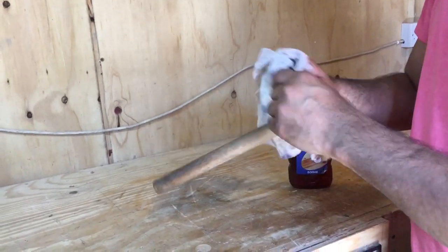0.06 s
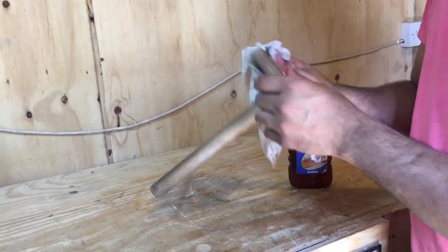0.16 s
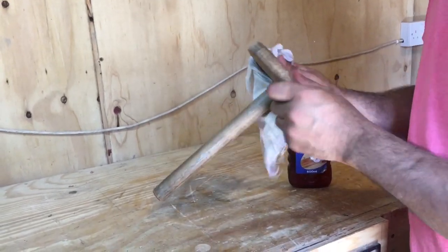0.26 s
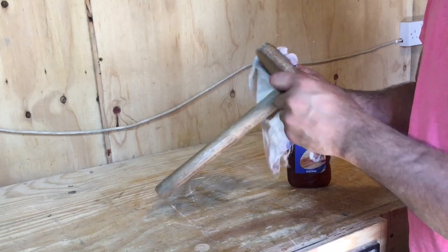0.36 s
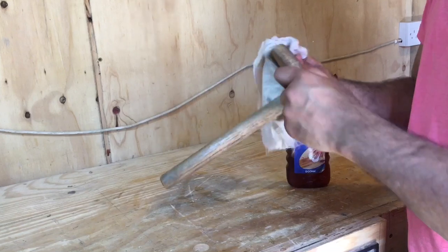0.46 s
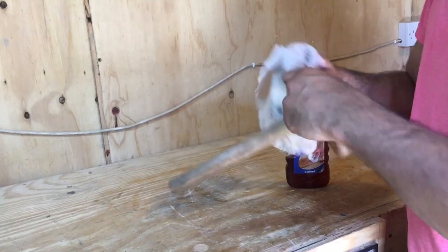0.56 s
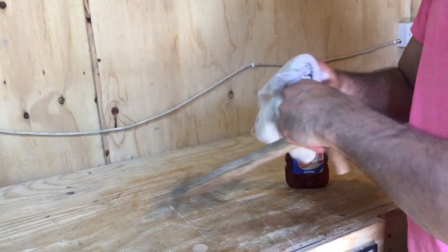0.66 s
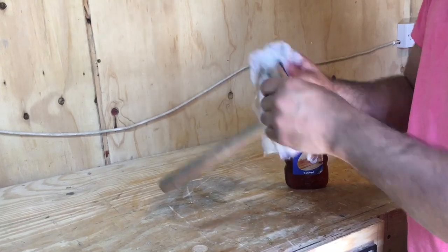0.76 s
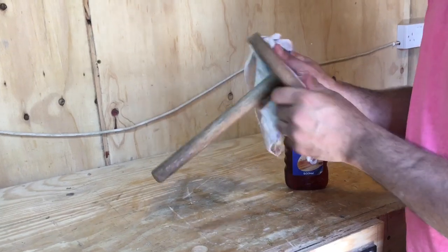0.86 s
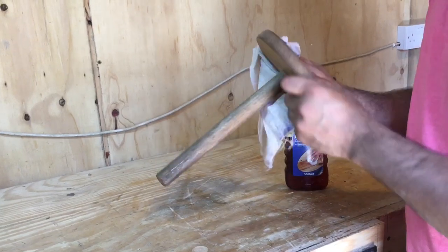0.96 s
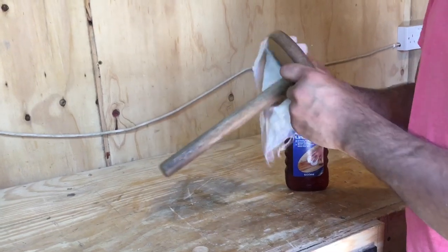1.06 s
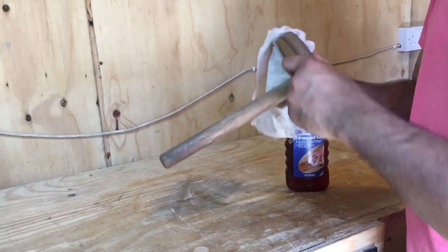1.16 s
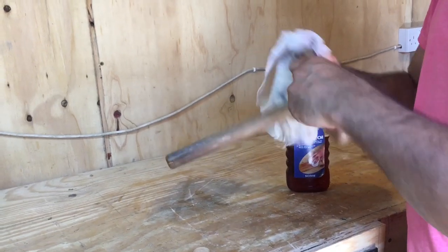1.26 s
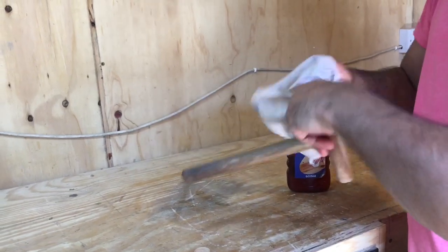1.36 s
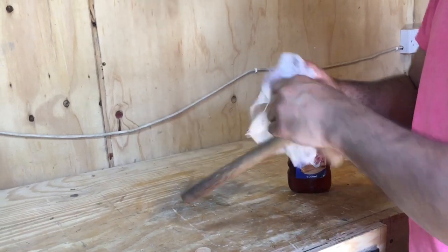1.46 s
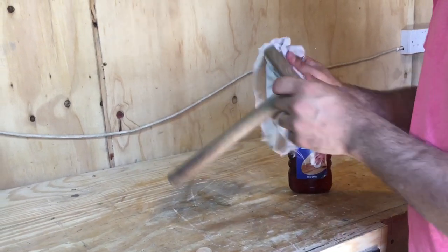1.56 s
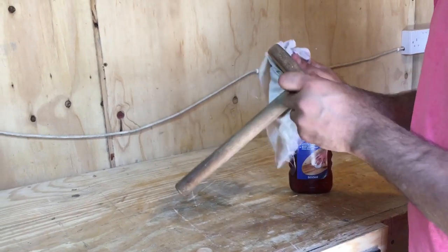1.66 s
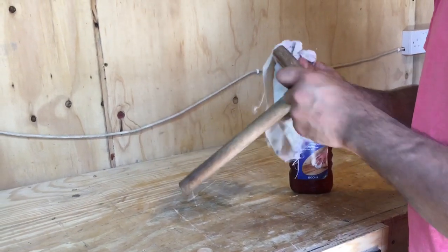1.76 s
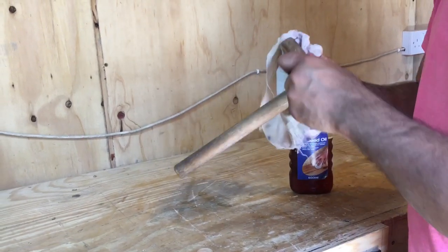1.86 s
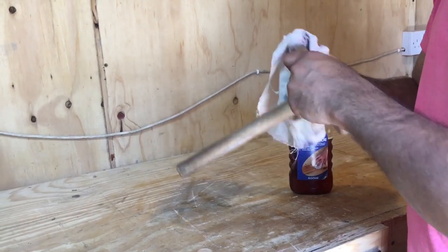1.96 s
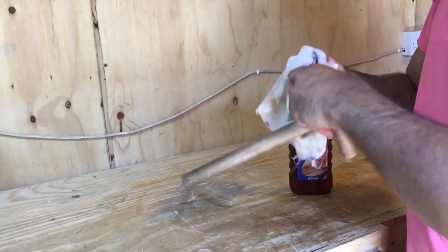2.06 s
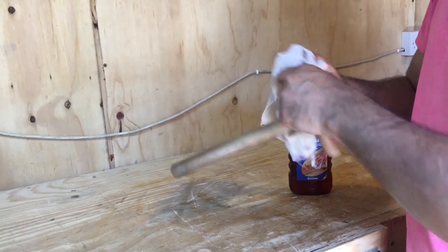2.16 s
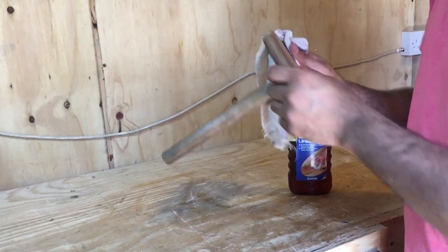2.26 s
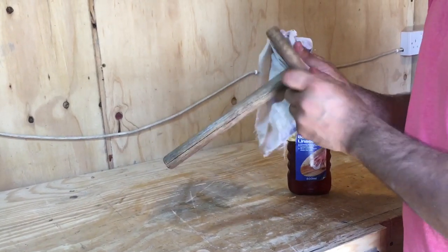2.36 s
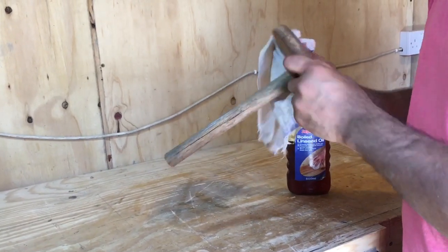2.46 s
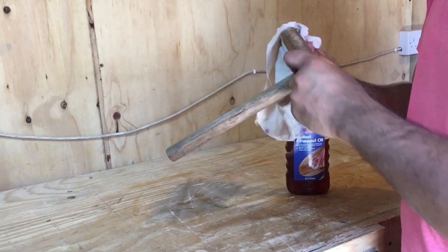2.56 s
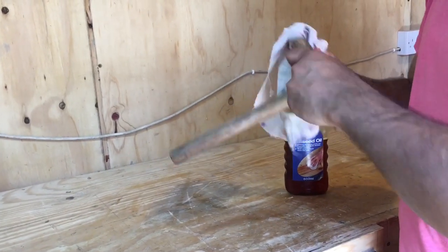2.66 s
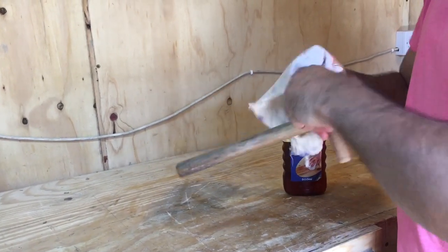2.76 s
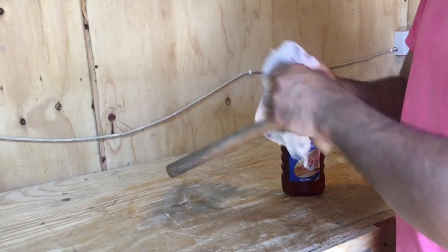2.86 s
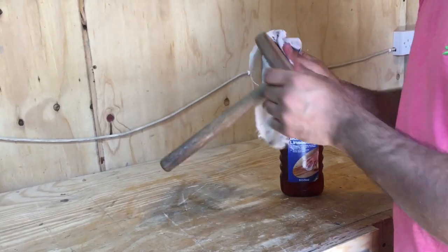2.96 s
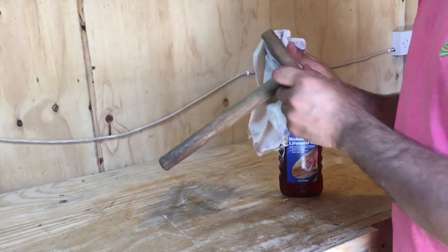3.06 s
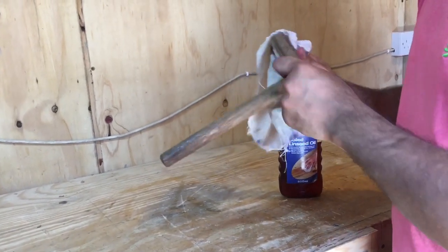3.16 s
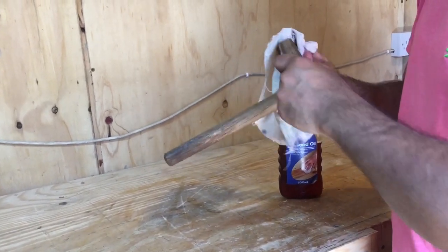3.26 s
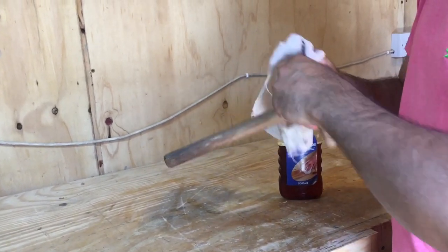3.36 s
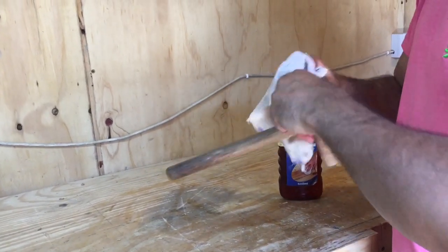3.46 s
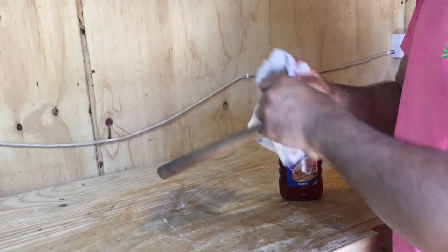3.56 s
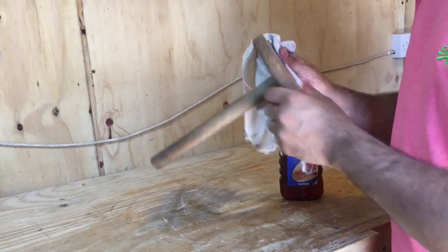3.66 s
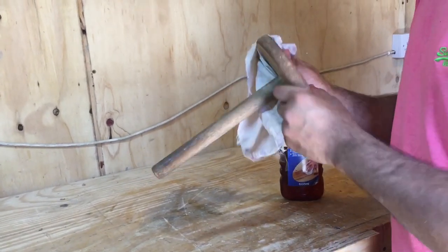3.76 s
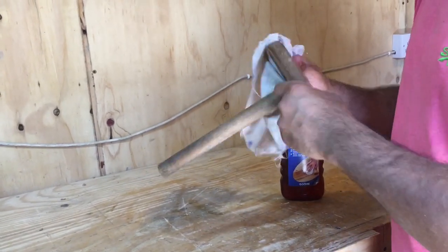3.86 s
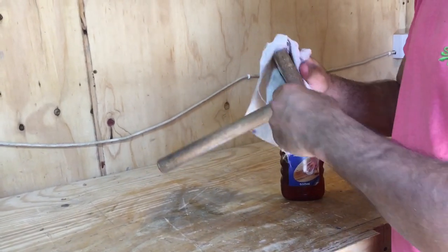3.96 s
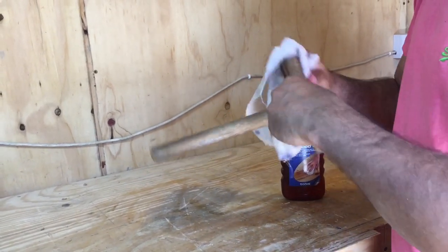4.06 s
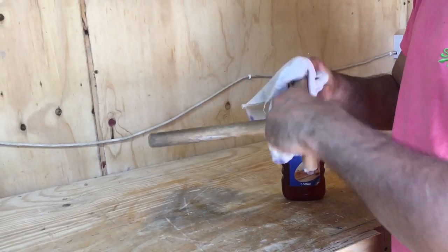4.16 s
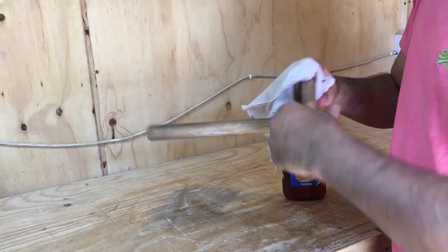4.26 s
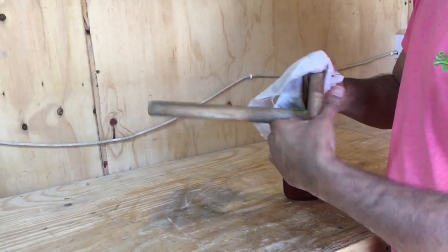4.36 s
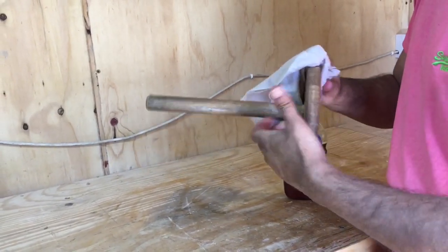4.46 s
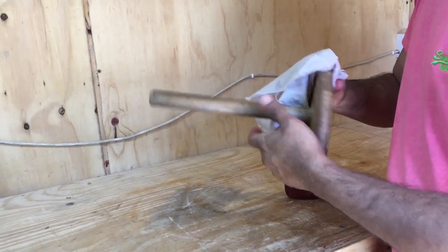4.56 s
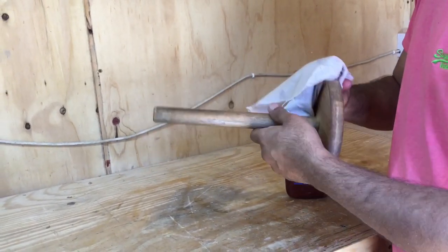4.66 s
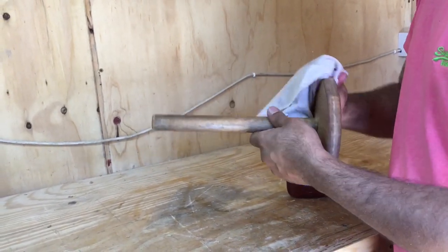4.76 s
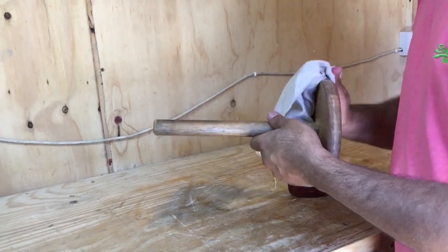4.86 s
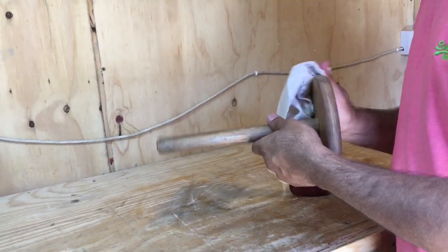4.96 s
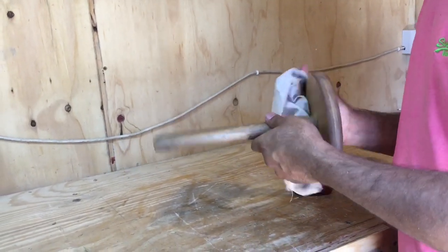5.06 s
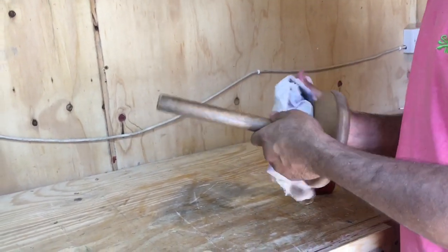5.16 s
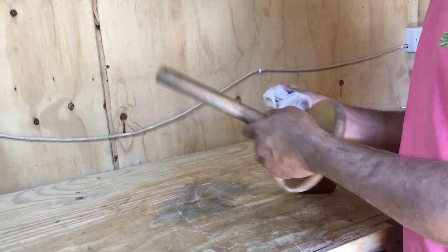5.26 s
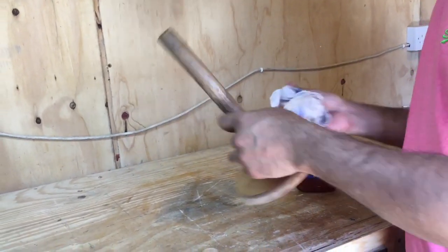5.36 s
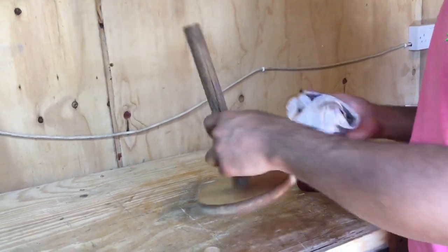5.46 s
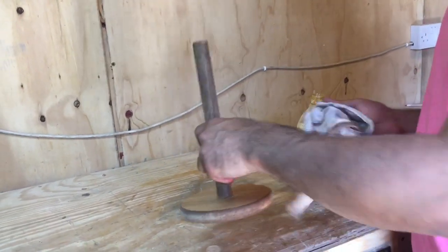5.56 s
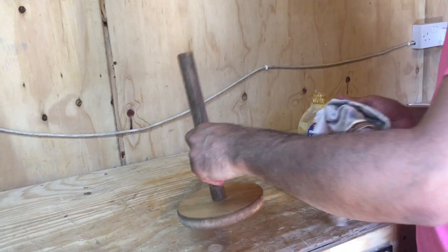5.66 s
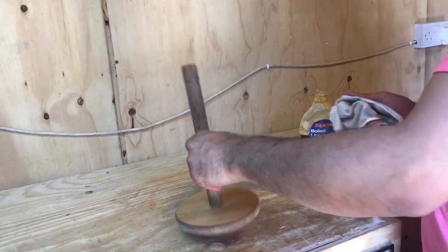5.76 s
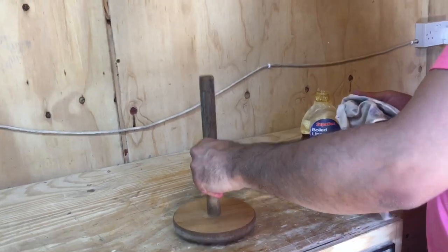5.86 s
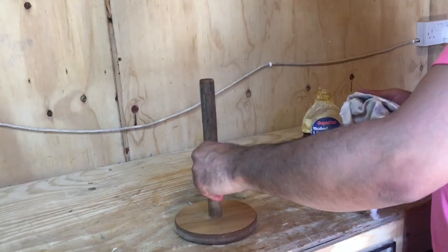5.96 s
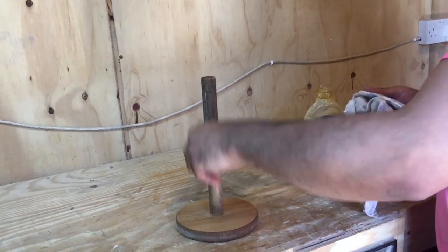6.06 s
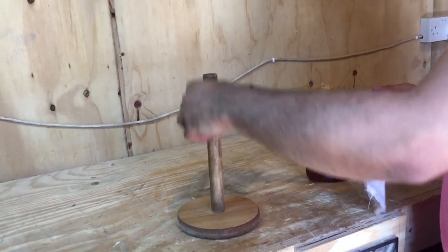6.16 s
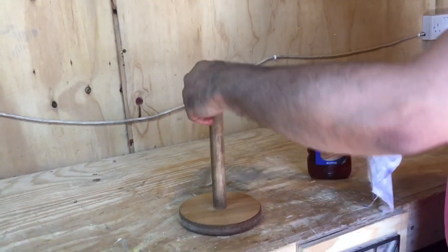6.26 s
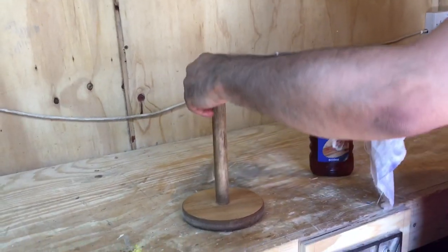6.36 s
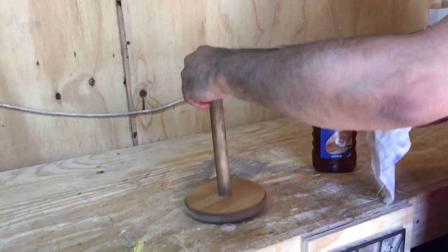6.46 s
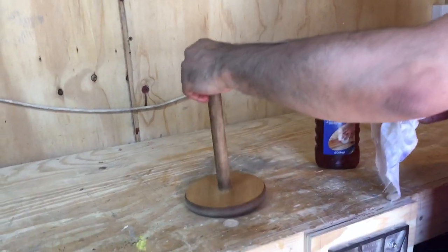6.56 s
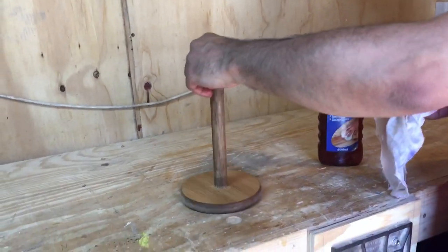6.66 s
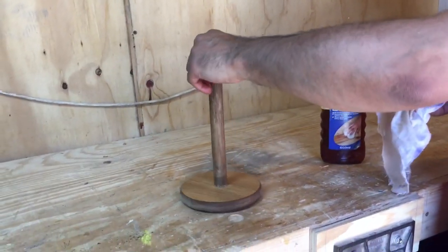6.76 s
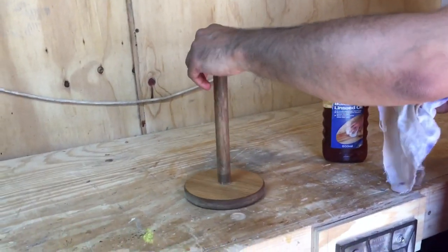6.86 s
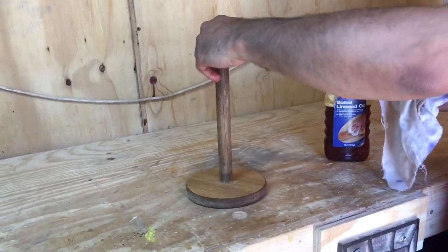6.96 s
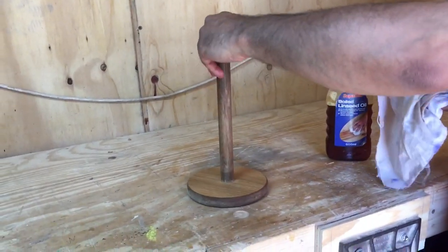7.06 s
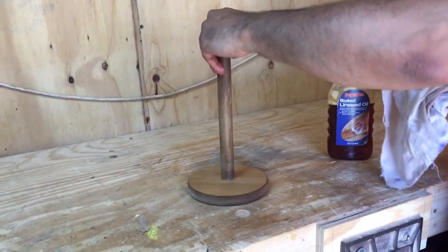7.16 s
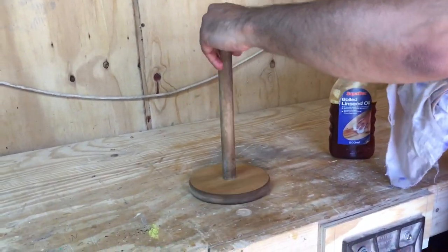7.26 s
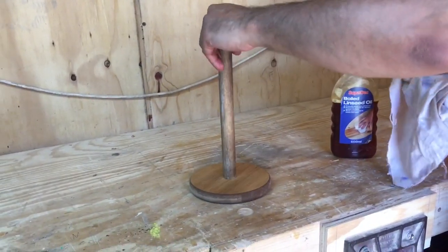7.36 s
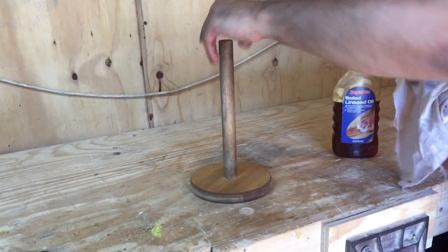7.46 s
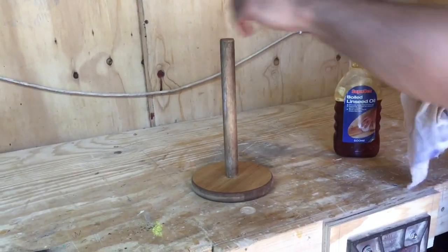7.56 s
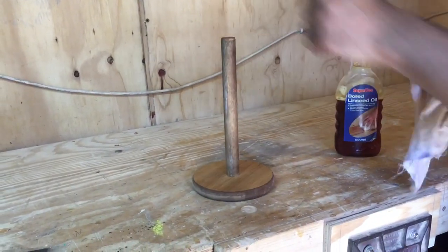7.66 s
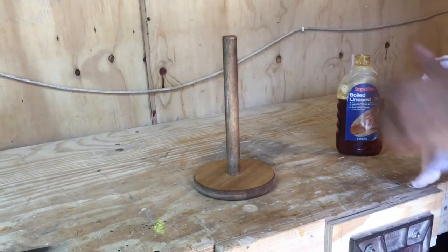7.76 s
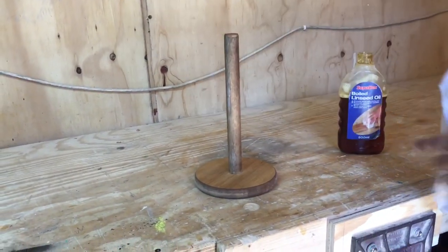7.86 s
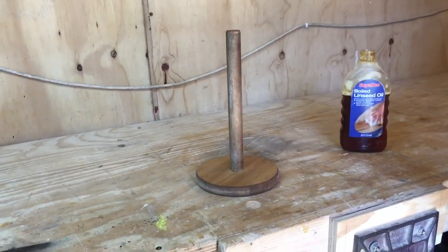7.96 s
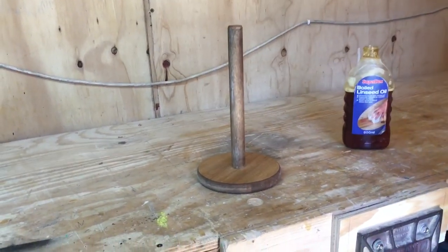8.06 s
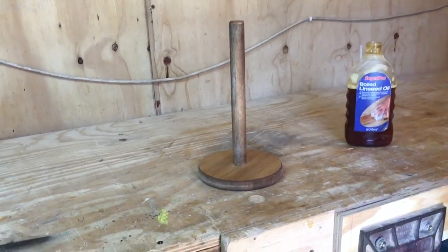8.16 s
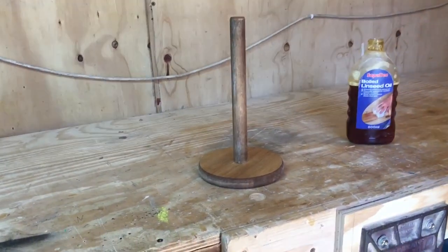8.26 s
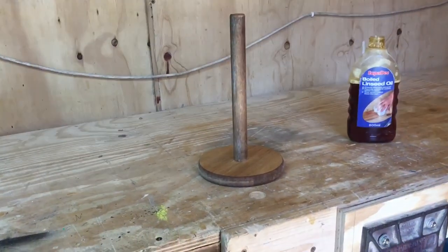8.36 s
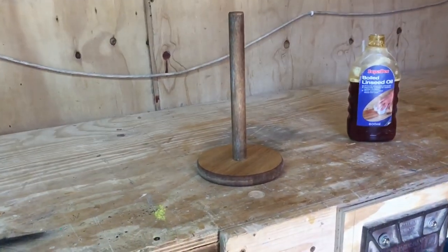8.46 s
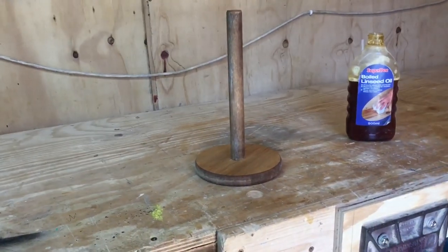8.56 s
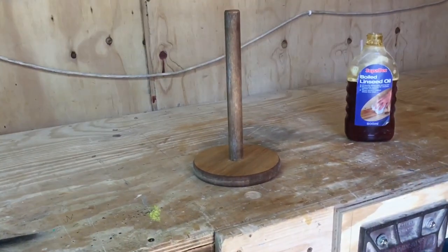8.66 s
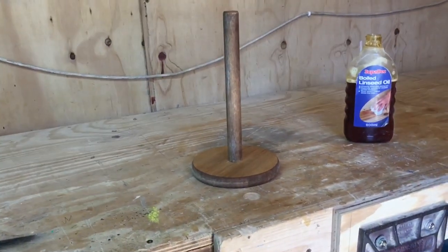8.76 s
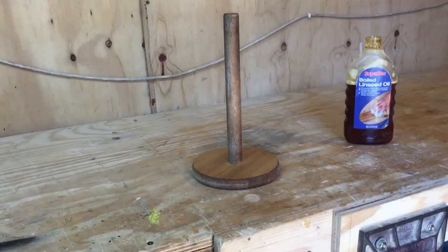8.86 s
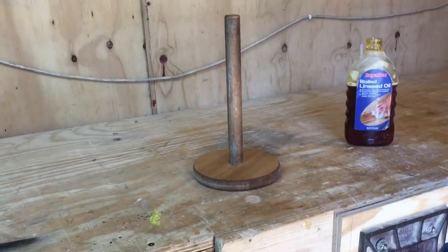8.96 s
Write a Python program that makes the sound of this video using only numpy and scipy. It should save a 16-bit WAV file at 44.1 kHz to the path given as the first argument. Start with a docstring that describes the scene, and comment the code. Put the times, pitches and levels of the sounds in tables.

```python
"""Quick strokes of a cloth on a wooden stand, close by in a plywood shed, over the drone of far traffic
in the shed's low modes. The fibres hiss, and firm strokes make the wood sing. At six seconds the stand
is set on the bench and the shed booms; the stand rocks on its rim, slides with a judder and knocks again.
Then hands brush clothing and small things tap nearby. The walls answer the hits briefly."""
import sys
import numpy as np
from scipy import signal
from scipy.fft import rfft, irfft, next_fast_len
from scipy.io import wavfile
from scipy.ndimage import uniform_filter1d, map_coordinates

SR = 44100
rng = np.random.default_rng(int(sys.argv[2]) if len(sys.argv) > 2 else 0)


def pcm_store(signal):
    """Save signal as 16-bit PCM."""
    levels = np.round(np.clip(np.atleast_2d(signal), -1, 1) * 32767)
    wavfile.write(sys.argv[1], SR, levels.astype(np.int16).T)


N = 396882
LEVEL_TIMES = np.arange(0, N / SR + .001, .001)  # seconds, one point each millisecond

# Resonances of the wooden stand. Each row: frequency in Hz, width in Hz, gain in dB.
STAND_MODES = [(1155, 14, -3), (1484, 8.3, 4.5), (1747, 14, 0.5), (1770, 14, -24), (2248, 16, -7),
               (3074, 17, 2.5), (3850, 20, -15), (4260, 32, -23)]
# Low resonances, the shed's air first, then the bench. Each row: frequency in Hz, width in Hz, gain in dB.
BOOM_MODES = [(67.8, 4, 5), (103.7, 9.8, -1), (128.3, 13.6, -7.5), (147.5, 28, -13)]


def amp(db):
    """Gain of a level in dB."""
    return 10 ** (np.asarray(db) / 20)


def unit(x):
    """x at rms 1."""
    return x / np.sqrt(np.mean(x ** 2) + 1e-20)


def along(points, hz):
    """Read (Hz, value) points at hz, on a log frequency axis."""
    freqs, values = np.transpose(points)
    return np.interp(np.log(hz + 1), np.log(freqs + 1), values)


def curves(rows):
    """One value per sample for each column after the time."""
    times, *columns = np.transpose(rows)
    return [np.interp(np.arange(N) / SR, times, column) for column in columns]


def per_sample(level):
    """A level of each millisecond, read at every sample."""
    return np.interp(np.arange(N) / SR, LEVEL_TIMES, level)


def wobble(rate):
    """A smooth random curve, rate knots a second."""
    return map_coordinates(rng.standard_normal(int(N * rate / SR) + 4), [np.arange(N) * rate / SR])


def filtered(x, response):
    """x through a complex response of frequency."""
    size = next_fast_len(N + SR // 2)
    return irfft(rfft(x, size) * response(np.fft.rfftfreq(size, 1 / SR)), size)[..., :N]


def shaped(x, spectrum):
    """x coloured by (Hz, dB) points, rms 1."""
    return unit(filtered(x, lambda hz: amp(along(spectrum, hz))))


def modes(peaks):
    """Causal response of (Hz, width in Hz, dB) resonances of alternating sign."""
    return lambda f: sum((-1) ** k * amp(db) * 1j * f * width / (hz * hz - f * f + 1j * f * width)
                         for k, (hz, width, db) in enumerate(peaks))


def ring(partials, t, scatter_db):
    """One blow on (Hz, dB, t60 in seconds) modes, each at a new strength; peak 1."""
    x = sum(amp(db + scatter_db * rng.normal() - 60 * t / t60) * np.sin(2 * np.pi * hz * t)
            for hz, db, t60 in partials)
    return x / np.abs(x).max()


def grit(patchy_db, grain_db):
    """White friction noise: patches in pitch and time, and grains of uneven size."""
    grains = signal.stft(rng.standard_normal(N) * amp(grain_db * wobble(400)), nperseg=512)[2]
    patches = uniform_filter1d(uniform_filter1d(rng.standard_normal(grains.shape), 6, 0), 8, 1)
    return unit(signal.istft(grains * amp(patchy_db * unit(patches)), nperseg=512)[1][:N])


def stroke_db(start, length, change_db, rise_db_s, fall_db_s):
    """Level of a rub each millisecond: it sets in, drifts by change_db, then lets go."""
    times = [start - 80 / rise_db_s, start, start + length, start + length + 80 / fall_db_s]
    return np.interp(LEVEL_TIMES, times, [-80, 0, change_db, change_db - 80])


def traffic():
    """Far off: a broad rumble and an engine slowing as it leaves."""
    rumble_levels = [(0.0, -53.5), (2.1, -51.5), (2.43, -54), (4.04, -53.5), (5.67, -57), (5.95, -54.5),
                     (7.6, -51), (8.086, -58.5), (8.554, -55.5), (9.0, -53.5)]  # Each row: time in seconds, level in dB.
    rumble_spectrum = [(15, -48), (25, -28), (46, 5.5), (65, 7), (92, -0.5), (118, 1), (156, -1.5),
                       (193, -2.5), (343, -14), (500, -28), (650, -25.5), (1100, -120)]  # Each row: frequency in Hz, relative density in dB.
    engine = [(0, 75.8, -46.5), (.7, 77.04, -45.5), (1.1, 73.1, -50), (1.8, 67.4, -55.5), (2.7, 64.8, -70),
              (4.1, 55.3, -48), (4.8, 46.9, -56), (5.6, 41.8, -66.5), (5.9, 39.8, -92)]  # Each row: time in seconds, note in Hz, level in dB.
    rumble_db, = curves(rumble_levels)
    rumble = amp(rumble_db) * shaped(rng.standard_normal(N) * amp(2.3 * wobble(9.7)), rumble_spectrum)
    engine_hz, engine_db = curves(engine)
    engine_phase = 2 * np.pi * np.cumsum(engine_hz) / SR
    return rumble + amp(engine_db + 2 * wobble(11)) * np.sin(engine_phase + 1.1 * wobble(3.4))


def shed_drone():
    """Two low notes of the shed, stirred by far traffic, then booming on after the stand is set down."""
    notes_hz = [65.1, 106.5]  # The two pitches in Hz.
    levels = [(0.0, -54, -65), (0.71, -44, -53), (2.15, -60.5, -54.5), (2.8, -45.5, -62), (3.13, -67, -62),
              (3.73, -59, -53.5), (4.44, -50, -63), (4.9, -69, -67), (6.0, -60, -63.5), (6.17, -37.5, -55),
              (6.3, -46, -58), (6.4, -40.5, -53), (6.55, -48, -55), (6.62, -70, -65)]  # Each row: time in seconds, level of each note in dB.
    out = np.zeros(N)
    for hz, db in zip(notes_hz, curves(levels)):
        level = amp(db + 4.9 * wobble(9.8))
        out += level * np.sin(2 * np.pi * hz * np.arange(N) / SR + 1.64 * wobble(7.3))
    return out


def room_air():
    """A faint, steady hiss of air all around the microphone."""
    spectrum = [(180, -23), (300, -1.5), (461, -6), (794, -7.5), (1050, -8), (5750, -22.5), (7740, -27.5),
                (8830, -24), (13100, -32), (15500, -44)]  # Each row: frequency in Hz, relative density in dB.
    return amp(-70) * shaped(grit(patchy_db=0, grain_db=0.5), spectrum)


def cloth():
    """Close by, fibres hiss over the grain; pressure also wakes the modes of the stand."""
    # Strokes of cloth and skin. Each row: start and length in seconds, first and last hiss level in dB,
    # pressure sound in dB over the hiss.
    strokes = [(0, 0.048, -58, -58, -1), (0.143, 0.17, -70.5, -71.5, -6.5),
               (0.42, 0.091, -66.5, -56.5, -4.5), (0.551, 0.15, -57.5, -55.5, -3),
               (0.792, 0.22, -68, -76, -2), (1.05, 0.12, -72, -57.5, -4.5), (1.213, .2, -59.5, -54.5, -4),
               (1.487, 0.18, -71.5, -69, -6), (1.755, 0.14, -74, -67, -1.5),
               (1.937, 0.21, -62.5, -57, -1.5), (2.259, 0.076, -70, -70.5, -5),
               (2.512, .065, -65.5, -59, -5), (2.606, .22, -65.5, -53.5, -3.5),
               (2.922, 0.062, -70.5, -66.5, -4), (3.0, .1, -72, -79.5, -16), (3.208, 0.12, -61, -59, -3.5),
               (3.359, 0.14, -63, -56, -2), (3.606, 0.18, -70, -71.5, 0.5),
               (3.874, 0.069, -67.5, -58.5, -6.5), (3.995, 0.057, -61.5, -60.5, -2),
               (4.118, 0.088, -59.5, -58.5, -5.5), (4.32, 0.056, -81, -76, 3),
               (4.372, 0.028, -68, -61.5, 5.5), (4.657, .33, -84, -75, 1.5), (5.04, 0.077, -76, -67, -5),
               (5.11, 0.25, -72.5, -73, -3), (5.42, 0.53, -79.5, -82.5, -15), (6.25, 0.24, -83, -76.5, 7),
               (7.597, 0.023, -71, -66, 1.5), (7.627, 0.043, -61, -60.5, 3), (7.723, 0.23, -73.5, -83, 4.5),
               (8.047, 0.2, -77.5, -76, 4.5), (8.244, .04, -71.5, -70, 8.5), (8.319, 0.024, -69, -66, 4),
               (8.438, 0.23, -80, -77.5, 0.5), (8.646, 0.029, -71, -64, 3.5),
               (8.668, 0.063, -63.5, -59, 2.5), (8.759, 0.23, -68.5, -76, 7)]
    # Fidgets of the cloth and grit under the base. Each row: start in seconds, dB, length in seconds.
    fidgets = [(.91, -74, .025), (1.82, -64.5, 0.025), (1.868, -68.5, 0.019), (2.42, -72, 0.033),
               (3.075, -77, .02), (4.486, -67, 0.045), (4.54, -69.5, 0.036), (4.667, -65, 0.023),
               (4.7, -74, 0.025), (4.733, -67, 0.018), (4.766, -66, 0.011), (4.81, -68, 0.011),
               (4.856, -69, 0.012), (4.8806, -63.5, 0.03), (4.927, -73, 0.04), (5.345, -75, 0.016),
               (5.558, -72.5, .025), (6.007, -73, 0.021), (6.045, -62.5, 0.011), (6.84, -68, .02),
               (6.92, -73, .012), (6.94, -70, .012), (6.954, -69.5, 0.024), (6.989, -69.5, 0.024)]
    # Colours of the fibre hiss and the pressure sound. Each row: frequency in Hz, relative density in dB.
    fibre_spectrum = [(1470, -13.5), (2500, -7), (4330, -1), (4930, -5), (5700, -0.5), (7110, -3),
                      (7790, -5), (9140, -5.5), (12200, -10.5), (15500, -22.5)]
    press_spectrum = [(470, 3), (800, 0), (960, 0), (1710, 6.5), (2240, 3.5), (2990, 3.5), (4000, -0.5),
                      (5200, -2.5), (8800, -120)]
    let_go_s = 7.5  # the hand leaves the stand; later rubbing no longer rings in it
    hiss, press, flicks = np.zeros((3, len(LEVEL_TIMES)))
    for start, length, first_db, last_db, press_db in strokes:
        level = amp(first_db + stroke_db(start, length, last_db - first_db, rise_db_s=1196, fall_db_s=358))
        hiss = np.hypot(hiss, level)
        press = np.hypot(press, amp(press_db) * level)
    for start, db, length in fidgets:
        age = np.clip(LEVEL_TIMES - start, 0, 1) / (.35 * length)
        flicks += amp(db) * age * np.exp(1 - age ** 1.1)
    hiss = per_sample(hiss) * amp(.9 * wobble(25)) + per_sample(flicks)
    rub = grit(patchy_db=1.8, grain_db=1.5)
    stand_gain = amp(-8 + 3.2 * wobble(6.7)) * per_sample(LEVEL_TIMES < let_go_s)
    body = shaped(rub, press_spectrum) + stand_gain * unit(filtered(rub, modes(STAND_MODES)))
    return hiss * shaped(rub[::-1], fibre_spectrum) + per_sample(press) * unit(body)


def squeaks():
    """A firm stroke makes one mode of the stand sing with a shaky phase."""
    notes = [(.57, -59.5, 1524, .12), (0.815, -61, 1465, 0.025), (2.751, -62, 1730, 0.13),
             (2.798, -57.5, 3700, 0.048), (2.921, -65, 1503, 0.064), (6.432, -74, 1700, 0.044),
             (6.656, -60.5, 3000, 0.097), (6.65, -51, 3660, 0.034), (6.673, -49.5, 1504, 0.047)]  # Each row: start in seconds, level in dB, pitch in Hz, length in seconds.
    out = np.zeros(N)
    for start, db, hz, length in notes:
        t = np.arange(round(length * SR)) / SR
        shake = np.cumsum(.09 * rng.standard_normal(8192))[:len(t)]
        fade = signal.windows.tukey(len(t), .5)
        out[round(start * SR):][:len(t)] += amp(db) * fade * np.sin(2 * np.pi * hz * t + shake)
    return out


def ticks():
    """Small hard contacts nearby: one short mode with neighbours, smeared by a gritty touch."""
    # Each row: start in seconds, peak in dB, pitch in Hz, t60 in seconds, roughness from 0 to 1.
    contacts = [(1.417, -42.5, 1173, 0.073, 0.48), (2.419, -44, 2614, 0.028, 0.4),
                (4.331, -42, 296, 0.062, 0.3), (4.331, -48.5, 1380, .025, 0.46),
                (4.35, -40.5, 253, .07, 0.18), (4.344, -47, 1660, 0.037, 0.15),
                (4.55, -55, 3020, 0.047, 0.3), (5.359, -57, 3110, 0.028, 0.7),
                (5.568, -52, 2987, 0.071, 0.05), (5.568, -62, 5070, .06, .2),
                (6.047, -47, 3770, 0.017, 0.7), (6.63, -40, 3720, 0.018, 0.33),
                (7.918, -49.5, 1165, 0.035, 0.6), (7.95, -40.5, 200, 0.22, 0.1),
                (8.107, -52, 2270, 0.025, 0.65), (8.332, -48, 1910, 0.019, 0.36),
                (8.378, -42, 890, 0.013, 0.3), (8.534, -52, 1260, 0.016, 0.5)]
    out, t = np.zeros(N + SR), np.arange(SR // 5) / SR
    for start, db, hz, t60, rough in contacts:
        tick = ring([(hz, 0, t60), (1.13 * hz, -5, t60), (.86 * hz, -6, t60)], t, scatter_db=1.5)
        tick *= 1 - rough + rough * unit(uniform_filter1d(rng.standard_normal(len(t)), size=40))
        tick *= 1 - np.exp(-t / 0.00014)
        out[round(start * SR):][:len(t)] += amp(db) * tick / np.abs(tick).max()
    return out[:N]


def shed_reverb(x):
    """The plywood walls answer 4.5 ms late, each frequency dying at its own speed."""
    decay_times = [(150, 0.24), (1000, 0.16), (8000, 0.23)]  # Each row: frequency in Hz, t60 in seconds.
    hz, t, noise = signal.stft(rng.standard_normal(SR // 2), SR, nperseg=256)
    tail = signal.istft(noise * amp(-60 * t / along(decay_times, hz)[:, None]), SR, nperseg=256)[1]
    return signal.fftconvolve(np.pad(x, (200, 0)), tail / np.linalg.norm(tail))[:N]


def knocks():
    """The stand's base strikes the bench's modes, then chatters; a longer contact is duller."""
    contacts = [(6.016, -9, 0.42), (6.021, -15, 0.41), (6.037, -13.5, 0.55), (6.054, -20.5, 0.57),
                (6.074, -34, 0.5), (6.63, -22.5, 0.23), (6.848, -22.5, 0.53), (6.955, -21, 0.76),
                (6.975, -32.5, 1), (6.993, -31, 0.59), (7.019, -39, 0.38)]  # Each row: start in seconds, force in dB, contact time in milliseconds.
    bench_modes = [(180, 27, -1), (273, 19, -4), (310, 35, -4), (385, 98, -1), (527, 35, -0.5),
                   (574, 43, -0.5), (683, 100, -2.5), (811, 44, -4.5), (984, 82, -6), (1337, 22, -4),
                   (1740, 140, -17.5), (2340, 89, -10)]  # Each row: frequency in Hz, width in Hz, gain in dB.
    force, t = np.zeros(N + SR), np.arange(4096) / SR
    for start, db, contact_ms in contacts:
        chatter = 0.088 * amp(-60 * t / 0.044) * rng.standard_normal(len(t))
        chatter[0] = 1  # the blow itself
        age = t[:512] / (contact_ms / 4000)
        push = age ** 2 * np.exp(-age)
        force[round(start * SR):][:len(t)] += amp(db) * np.convolve(chatter, push / push.max())[:len(t)]
    return filtered(force[:N], lambda hz: modes(bench_modes)(hz) + amp(-18))


def heaves():
    """The low modes of shed and bench swell while the stand's weight settles, then die."""
    # Each row: start in seconds, shed gain and bench gain in dB, time to the top in seconds.
    loads = [(6.02, -25.5, -22, 0.05), (6.637, -51, -38, 0.03), (6.811, -49, -28.5, 0.021),
             (6.837, -42, -25, 0.037), (6.893, -41, -31, 0.02), (6.959, -32, -28, 0.034),
             (7.008, -43, -35, 0.028), (7.47, -51, -46, 0.026)]
    out, t = np.zeros(N + SR), np.arange(SR // 2) / SR
    shed, *bench = [amp(db) * np.sin(2 * np.pi * hz * t) for hz, _, db in BOOM_MODES]
    for start, shed_db, bench_db, rise in loads:
        swell = (t / rise * np.exp(1 - t / rise)) ** 2.7
        out[round(start * SR):][:len(t)] += swell * (amp(shed_db) * shed + amp(bench_db) * sum(bench))
    return out[:N]


def slides():
    """Base and hands judder over the bench: board and low modes ring, the rasp partly rings the stand."""
    # Each row: start and length in seconds, change over the push in dB, levels of board, boom, rasp and
    # hiss in dB, share of the rasp's power that rings in the stand from 0 to 1.
    pushes = [(6.636, 0.075, -.5, -50, -39, -50.5, -64, 0.48),
              (6.73, 0.05, 1, -45.5, -46, -53, -66.5, 0.22),
              (6.799, 0.045, -7.5, -57, -35.5, -63, -73, 0.3), (7.2, 0.1, 10, -69, -58.5, -65.5, -67, 0),
              (7.325, 0.063, -0.5, -56, -52, -49.5, -57.5, 0),
              (7.397, 0.06, -0.5, -48.5, -46, -54.5, -67, 0.05),
              (7.955, 0.027, 2, -69, -53, -82, -57.5, 0.3)]
    board_modes = [(332, 39, 10.5), (737, 44, 5), (1060, 5.4, 1)]  # Each row: frequency in Hz, width in Hz, gain in dB.
    rasp_spectrum = [(530, 0), (900, 2), (2510, -4.5), (2910, -4), (3390, -7), (4100, -13.5), (6000, -24),
                     (7800, -22), (13200, -120)]  # Each row: frequency in Hz, relative density in dB.
    levels = np.zeros((5, len(LEVEL_TIMES)))
    for start, length, change_db, board_db, boom_db, rasp_db, hiss_db, share in pushes:
        plain, ringing = np.sqrt([1 - share, share]) * amp(rasp_db)
        gains = [amp(board_db), amp(boom_db), plain, ringing, amp(hiss_db)]
        envelope = amp(stroke_db(start, length, change_db, rise_db_s=1502, fall_db_s=270))
        levels = np.hypot(levels, np.outer(gains, envelope))
    judder = grit(patchy_db=2.5, grain_db=0.8) * amp(1.63 * wobble(60))
    board = unit(filtered(judder, modes(board_modes + [(540, 370, -19)])))
    boom = unit(filtered(rng.standard_normal(N), modes(BOOM_MODES)))
    rasp = shaped(judder, rasp_spectrum)
    stand = unit(filtered(judder, lambda hz: modes(STAND_MODES)(hz) * hz / (hz + 1500)))
    hiss = shaped(judder, [(1200, -13), (3000, -8), (5000, -5.5), (8000, -9), (12000, -12.5), (15500, -27)])
    return sum(per_sample(level) * x for level, x in zip(levels, [board, boom, rasp, stand, hiss]))


def taps():
    """Dull taps nearby: a thin crack, then a damped push of about one cycle whose pitch sags."""
    # Each row: start in seconds, level in dB, settled pitch in Hz, crack gain in dB on top of the level.
    contacts = [(8.08, -46.5, 287, -14.5), (8.38, -34.5, 210, -30.5), (8.511, -47, 365, -17.5),
                (8.589, -29.5, 412, -6), (8.846, -46, 337, -24.5)]
    out, t = np.zeros(N + SR), np.arange(SR // 10) / SR
    for start, db, hz, crack_db in contacts:
        cycles = hz * (t + 0.00051 * (1 - np.exp(-t / 0.00011)))
        push = -np.sin(2 * np.pi * cycles) * (t * hz / 0.26) * np.exp(1 - t * hz / 0.37)
        crack = amp(crack_db) * np.sin(2 * np.pi * 2200 * t) * np.exp(-((t - .0005) / 0.00016) ** 2)
        out[round(start * SR):][:len(t)] += amp(db) * (push + crack)
    return out[:N]


def scene():
    """One microphone near the bench: the walls answer the hits, and steady air lies under all."""
    wood, dull, bright = knocks(), taps(), ticks()
    walls = shed_reverb(amp(-3) * wood + amp(-25) * dull + amp(-4) * bright)
    hits = wood + heaves() + dull + bright + walls
    return (room_air() + hits + cloth() + squeaks() + slides() + traffic() + shed_drone())[None]


def record(dry):
    """The microphone drops the deepest bass and passes nothing above its band limit."""
    low_cut_hz, top_hz = 46, 15650
    return filtered(dry, lambda hz: (hz < top_hz) * (1j * hz / (low_cut_hz + 1j * hz)) ** 4)


dry = scene()
out = record(dry)
pcm_store(out)
```